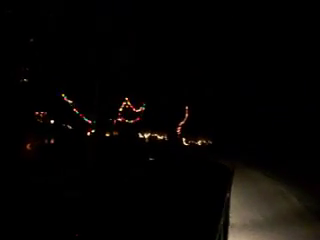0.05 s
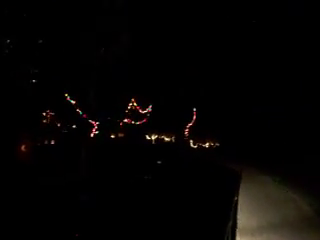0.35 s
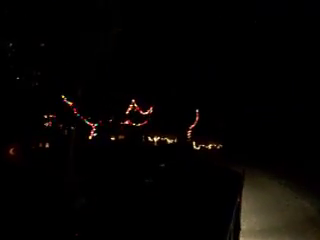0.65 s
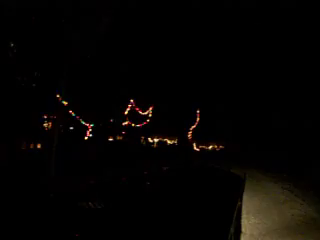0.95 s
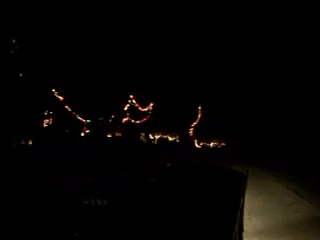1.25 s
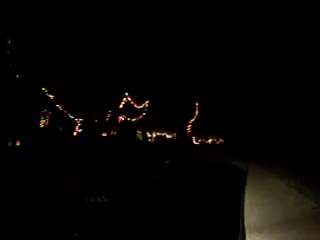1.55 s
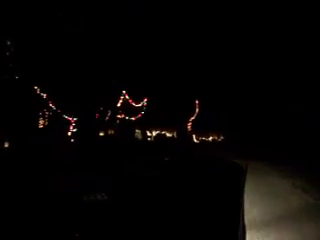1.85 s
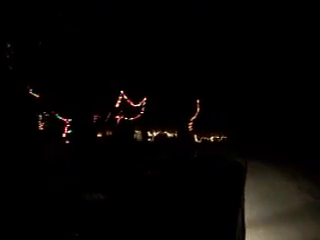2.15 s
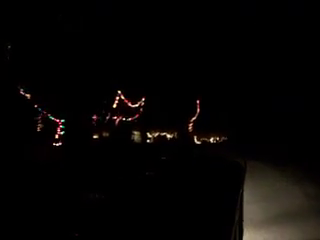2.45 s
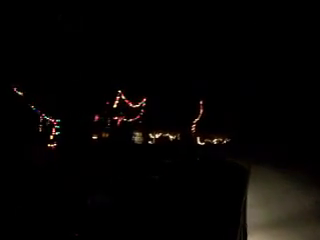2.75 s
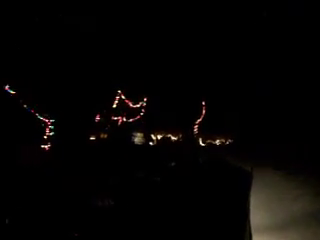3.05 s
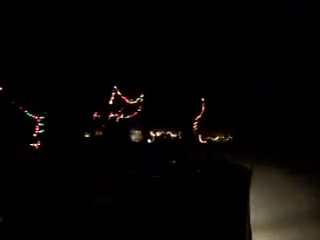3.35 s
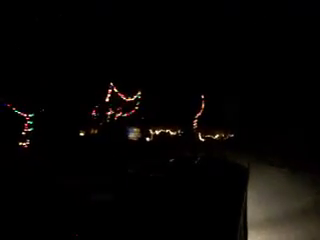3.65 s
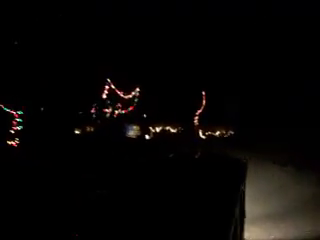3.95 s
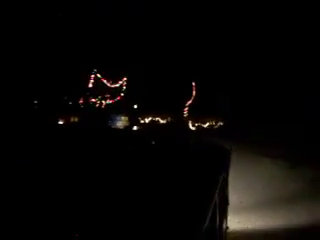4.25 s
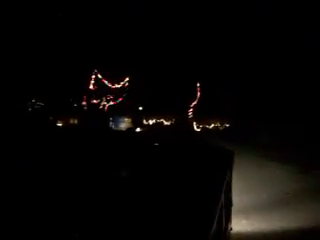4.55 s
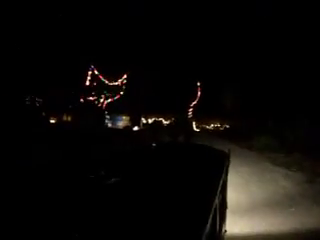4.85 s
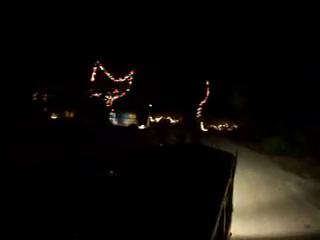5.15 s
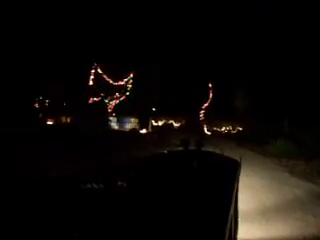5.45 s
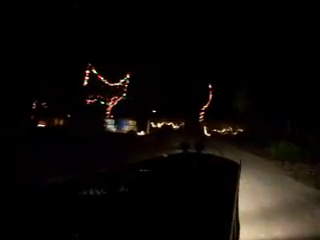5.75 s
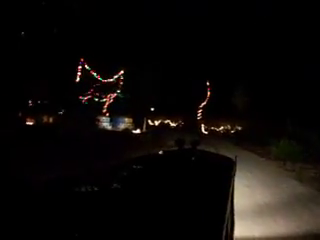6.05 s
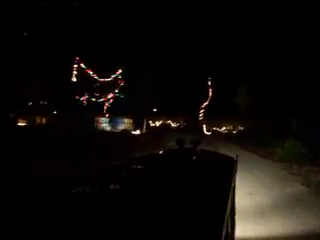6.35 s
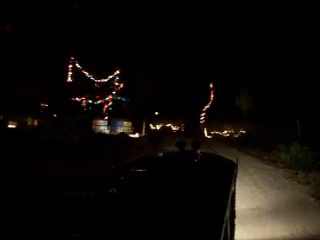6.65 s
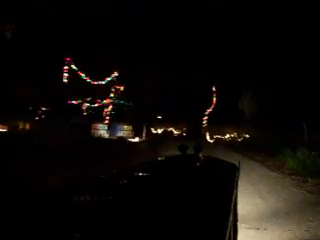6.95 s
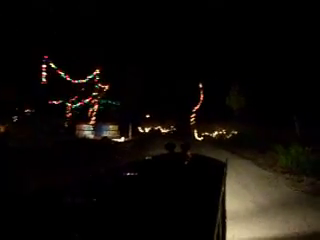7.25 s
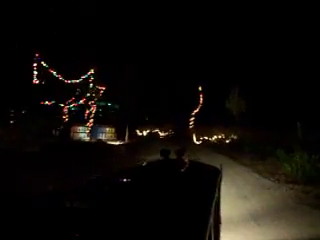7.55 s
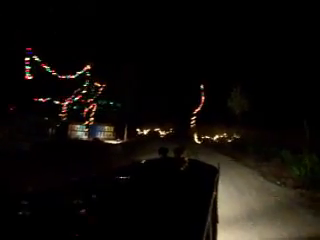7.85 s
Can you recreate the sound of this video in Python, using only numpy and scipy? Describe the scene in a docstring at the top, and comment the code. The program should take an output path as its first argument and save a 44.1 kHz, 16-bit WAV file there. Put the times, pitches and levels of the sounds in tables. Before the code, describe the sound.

Low, rapid exhaust beats drone from a miniature train rolling along its track, over wheel rumble, faint hiss and occasional knocks.

```python
"""Paired exhaust beats thump from the slow V-twin engine of a ride-on locomotive, heard from its seat.
Each cylinder's puff rings the muffler; the engine sags for about a second, then picks up again.
Firings and rough track shake the hood, valves tick, and wheels rumble and sing faintly on the rails,
under a light rattle and hiss. Bumps heave the chassis, slack parts knock now and then,
and loose metal clinks three times."""
import sys
import numpy as np
from scipy import signal
from scipy.fft import rfft, irfft, next_fast_len
from scipy.io import wavfile
from scipy.ndimage import map_coordinates

SR = 44100
rng = np.random.default_rng(int(sys.argv[2]) if len(sys.argv) > 2 else 0)


def int16_out(signal):
    """Quantize to a 16-bit WAV file."""
    q = np.round(np.clip(np.atleast_2d(signal).T, -1, 1) * 32767)
    wavfile.write(sys.argv[1], SR, q.astype(np.int16))


N = 348831
TIME = np.arange(N) / SR

# engine speed: t/s, speed/rpm
ENGINE_SPEED = [(0.0, 1433.4), (0.48, 1401.2), (1.06, 1456.0), (1.57, 1375.6), (1.93, 1203.4),
                (2.1, 1237.7), (2.6, 1214.9), (3.0, 1454.0), (3.3, 1417.7), (4.21, 1383.0), (4.4, 1403.5),
                (5.73, 1407.1), (6.33, 1356.9), (6.83, 1403.7), (7.07, 1388.7), (7.91, 1430.1)]
# how hard the locomotive pulls: t/s, level/dB
EFFORT = [(0, 2.3), (.25, -3.2), (.74, 0.1), (.9, -2.1), (1.35, 2), (1.92, -0.8), (2.12, 0.9), (2.53, 1.5),
          (2.65, -2.5), (3.02, -0.5), (4.5, .5), (4.75, -1.8), (5.8, 0.65), (6.52, 0.9), (6.82, -0.46),
          (7.58, 1), (7.73, -1), (7.91, 1.7)]
# tones the muffler rings at: f/Hz, width/Hz, level/dB
MUFFLER_TONES = [(66.7, 21, -8.5), (89.7, 26, -4.5), (99.5, 8.4, 3.5), (140, 21, -11), (192.2, 42, 0),
                 (234.4, 19.6, 0)]
# tones the hood panels ring at: f/Hz, width/Hz, level/dB
HOOD_TONES = [(349, 8, 1), (446.3, 26, 7), (482, 65, -4.5), (664, 16, -2.5), (838, 20, -2),
              (1090, 20, -8.5), (1140, 27, -10.5)]
# ticks in each engine cycle: place/cycle, f/Hz, width/Hz, level/dB
VALVE_TICKS = [(-.01, 5860, 2980, -4), (.035, 4180, 2990, -2), (.36, 5400, 3000, -4.5),
               (.53, 4800, 3040, -14), (.77, 2020, 672, 4.5), (.89, 2190, 660, 9)]
# bumps in the track: t/s, chassis heave/dB, change in rumble/dB
TRACK_BUMPS = [(.33, -42, 3), (.92, -29, 0), (1.73, -23, 1.4), (2.07, -19, 0.8), (3.17, -39, 1.8),
               (3.55, -30, 1.3), (4.16, -36, 1.3), (4.93, -24, -1.1), (6.29, -23, 2.5), (6.83, -35, 1),
               (7.17, -25.5, .2), (7.56, -27, 3.5)]
# how strong four noises are from low to high pitch: f/Hz, level/dB
SWAY_COLOUR = [(8, -10.5), (16, -2), (23, -3), (32, -6), (42, -5.5), (54, -9), (75, -27.5), (200, -120)]
RUMBLE_COLOUR = [(30, -10), (85, 2.5), (135, 1), (285, -1), (340, 1.5), (450, -2), (560, -4), (740, -9),
                 (850, -9.5), (1010, -14), (1130, -15), (1320, -27.5), (2000, -35.5), (5000, -120)]
RATTLE_COLOUR = [(500, -35.5), (1100, -12.5), (1350, 3), (1580, 1.5), (1850, 4.5), (2250, 3.5), (2800, -4),
                 (4000, -35), (9000, -70.5)]
HISS_COLOUR = [(1000, -22.5), (2500, -7), (3200, 10.5), (3700, 6), (4250, 8), (4650, 5.5), (4900, 7.5),
               (5400, 7), (5520, -2), (5700, 6.5), (6500, 1), (7450, -0.5), (8000, -45.5), (8900, -40.5)]
# slow rise and fall of the hiss and ticks: t/s, level/dB
TREBLE_DRIFT = [(0, 0.2), (1.9, -1.7), (2.7, 3), (3.05, -0.5), (4.45, 1.9), (5.55, -0.7), (7.91, 0.2)]
# wheel flanges (the guiding rims) rubbing the rail: start/s, end/s, f/Hz, width/Hz, level/dB
FLANGE_RUBS = [(0, 1.6, 4950, 300, -59), (1.95, 2.55, 7150, 450, -57), (2.1, 2.62, 1760, 60, -47),
               (2.0, 2.62, 1925, 80, -47.5), (2.44, 2.64, 3380, 120, -50), (2.9, 3.9, 4970, 220, -56),
               (4.8, 5.7, 5370, 130, -56)]
# knocks of slack parts in the running gear: t/s, relative level/dB
GEAR_KNOCKS = [(1.017, -31), (1.408, -31), (1.622, -29), (1.780, -28), (2.555, -28), (2.781, -29),
               (6.300, -27), (7.370, -22), (7.800, -29)]
# broad tones of a knock: f/Hz, width/Hz, level/dB
KNOCK_TONES = [(1100, 500, 5), (2000, 700, -1), (3300, 700, -5)]
# strikes of loose metal: t/s, peak level/dB
METAL_STRIKES = [(3.018, -34), (4.595, -20.5), (4.776, -33)]
# a strike and its bounce: delay/s, level/dB
STRIKE_AND_BOUNCE = [(0, 0), (.005, -2)]
# tones the metal rings at: f/Hz, level/dB, time to fade by 60 dB/s
METAL_TONES = [(2945, -4, .04), (3900, -7, .02), (4410, -8, .03), (5330, -4, .035), (5420, -2.5, .05),
               (6260, -5, .04), (6520, -6, .035)]

SECOND_FIRING = .371  # share of a cycle by which the second cylinder follows the first


def amp(db):
    """Turn decibels into a gain."""
    return 10 ** (np.asarray(db) / 20)


def unit(x):
    """Scale a sound to an average (rms) size of 1."""
    return x / np.sqrt(np.mean(x ** 2) + 1e-20)


def curve(points):
    """Join (time, value) points with straight lines."""
    return np.interp(TIME, *np.transpose(points))


def wobble(rate):
    """A smooth curve through `rate` random values a second."""
    return map_coordinates(rng.standard_normal(int(N * rate / SR) + 4), [TIME * rate])


def filtered(x, response):
    """Multiply each frequency in x by response(f)."""
    size = next_fast_len(N + SR // 2)
    return irfft(rfft(x, size) * response(np.fft.rfftfreq(size, 1 / SR)), size)[:N]


def coloured(x, colour):
    """Shape x with a colour table, at an average size of 1."""
    hz, db = np.transpose(colour)
    return unit(filtered(x, lambda f: amp(np.interp(np.log(f + 1), np.log(hz), db))))


def resonate(x, tones):
    """Let x ring a set of tones; narrow ones ring longer."""
    return filtered(x, lambda f: sum(amp(db) * 1j * f * width / (hz * hz - f * f + 1j * f * width)
                                     for hz, width, db in tones))


def strokes(cycle, place, scatter_db):
    """One tap of random size whenever the engine passes a place in its cycle."""
    at = np.flatnonzero(np.diff(np.floor(cycle - place)) > 0)
    taps = np.zeros(N)
    taps[at] = amp(scatter_db * rng.standard_normal(len(at)))
    return taps


def bursts(taps, fade_s):
    """Each tap becomes a burst of noise that drops 60 dB in fade_s."""
    fade = amp(-60 * TIME[:SR // 10] / fade_s)
    return signal.fftconvolve(taps, fade)[:N] * rng.standard_normal(N)


def chatter(rate, depth_db):
    """Noise from many small contacts, arriving in clumps."""
    return rng.standard_normal(N) * amp(depth_db * wobble(rate))


def puffs(cycle, place, width, scatter_db):
    """One puff of gas a cycle; its width is a share of the cycle, so it lengthens as the engine slows."""
    nearest = np.round(cycle - place).astype(int)
    sizes = amp(scatter_db * rng.standard_normal(nearest.max() + 2))
    return sizes[nearest] * np.exp(-.5 * ((cycle - place - nearest) / width) ** 2)


def exhaust(cycle, width, edge_width, edge_db, bass_cut_hz):
    """Each puff rings the muffler and has a sharper edge; the open pipe gives off little deep bass."""
    def both_cylinders(puff_width):
        first = puffs(cycle, 0, puff_width, scatter_db=0.7)
        return first + 0.86 * puffs(cycle, SECOND_FIRING, puff_width, scatter_db=-0.6)

    thump = unit(resonate(both_cylinders(width), MUFFLER_TONES))
    edge = amp(edge_db) * unit(both_cylinders(edge_width))
    return -unit(filtered(thump + edge, lambda f: f ** 2 / np.hypot(f ** 2, bass_cut_hz ** 2)))


def hood(cycle):
    """The hood's panels ring from the firings and from the rough track."""
    firings = strokes(cycle, 0, scatter_db=-0.5) + strokes(cycle, SECOND_FIRING, scatter_db=2.5)
    from_engine = unit(resonate(firings, HOOD_TONES))
    from_track = unit(resonate(chatter(rate=40, depth_db=2.5), HOOD_TONES))
    return amp(-19.5) * from_engine + amp(-6.5) * from_track


def valves(cycle):
    """Valve parts and burning fuel tick at the same places in every cycle."""
    ticks = np.zeros(N)
    for place, hz, width, db in VALVE_TICKS:
        taps = strokes(cycle, place, scatter_db=3.0)
        ticks += resonate(bursts(taps, fade_s=0.016), [(hz, width, db)])
    return unit(ticks)


def chassis_sway(heave, steady_db):
    """The chassis sways with a very deep noise that grows when a bump heaves it."""
    return np.hypot(amp(steady_db), heave) * coloured(rng.standard_normal(N), SWAY_COLOUR)


def wheel_rumble():
    """Wheels rolling on the rails make a low, slightly rough noise."""
    return coloured(chatter(rate=62, depth_db=0.65), RUMBLE_COLOUR)


def rattle():
    """Many small contacts blur into a light rattle."""
    return coloured(chatter(rate=180, depth_db=0.67), RATTLE_COLOUR)


def hiss():
    """Faster clumps of contacts make a high, grainy hiss."""
    return coloured(chatter(rate=380, depth_db=2.1), HISS_COLOUR)


def flange_song(ramp_s):
    """Each rub on the rail makes a wheel sing one unsteady, breathy note."""
    song = np.zeros(N)
    for start, end, hz, width, db in FLANGE_RUBS:
        contact = np.clip(np.minimum(TIME - start, end - TIME) / ramp_s, 0, 1)
        note = unit(resonate(chatter(rate=30, depth_db=2.5), [(hz, width, 0)]))
        song += amp(db) * contact * note
    return song


def bumps(half_width_s):
    """Each bump briefly heaves the chassis, and most swell the rumble too."""
    heave, swell_db = np.zeros(N), np.zeros(N)
    for s, heave_db, rumble_db in TRACK_BUMPS:
        hump = np.exp(-.5 * ((TIME - s) / half_width_s) ** 2)
        heave += amp(heave_db) * hump
        swell_db += rumble_db * hump
    return heave, swell_db


def gear_knocks(fade_s, treble_cut_hz):
    """Slack in the running gear closes with a short, dull knock."""
    blows = np.zeros(N)
    for s, db in GEAR_KNOCKS:
        blows[round(s * SR)] = amp(db + 4)
    knocks = resonate(bursts(blows, fade_s), KNOCK_TONES)
    return filtered(knocks, lambda f: 1 / np.hypot(1, (f / treble_cut_hz) ** 4))


def metal_clinks(crack_db, crack_fade_s, crack_hz, crack_width_hz):
    """Loose metal strikes with a crack, bounces once and rings briefly."""
    clinks, t = np.zeros(N + SR), TIME[:SR // 5]
    for s, db in METAL_STRIKES:
        for delay, bounce_db in STRIKE_AND_BOUNCE:
            ring = sum(amp(level + rng.normal(0, 1) - 60 * t / fade_s) * np.sin(2 * np.pi * hz * t)
                       for hz, level, fade_s in METAL_TONES)
            burst = amp(-60 * TIME / crack_fade_s) * rng.standard_normal(N)
            crack = resonate(burst, [(crack_hz, crack_width_hz, 0)])[:len(t)]
            hit = ring + amp(crack_db) * crack
            start = round((s + delay) * SR)
            clinks[start:start + len(t)] += amp(db + bounce_db) * hit / np.abs(hit).max()
    return clinks[:N]


def scene():
    """Add up all the sounds; the engine, hood, rumble, rattle and hiss swell with the effort."""
    effort_db = curve(EFFORT)
    heave, swell_db = bumps(half_width_s=0.058)
    fade_db = -0.25 * (TIME - TIME.mean())  # wheels and hood slowly get quieter
    rolling_db = -27.5 + effort_db + swell_db + fade_db + 0.74 * wobble(rate=7)
    rattle_db = -43 + effort_db + 0.5 * wobble(rate=7)
    treble_db = -46 + 0.93 * effort_db + curve(TREBLE_DRIFT) + 0.8 * wobble(rate=7.8)
    # engine cycles so far; a four-stroke cycle takes two turns
    cycle = .079 + np.cumsum(curve(ENGINE_SPEED)) / (2 * 60 * SR)
    beats = exhaust(cycle, width=0.016, edge_width=0.0077, edge_db=-20.0, bass_cut_hz=53.4)
    mix = amp(-16 + effort_db) * beats
    mix += amp(treble_db - 7) * valves(cycle)
    mix += amp(rolling_db) * hood(cycle)
    mix += chassis_sway(heave, steady_db=-32.5)
    mix += amp(rolling_db + 1) * wheel_rumble()
    mix += amp(rattle_db) * rattle()
    mix += amp(treble_db) * hiss()
    clinks = metal_clinks(crack_db=8, crack_fade_s=.03, crack_hz=4500, crack_width_hz=3500)
    mix += flange_song(ramp_s=0.091)
    mix += gear_knocks(fade_s=0.041, treble_cut_hz=3700)
    return (mix + clinks)[None]


def record(dry):
    """The highest treble falls away steeply, then stops altogether."""
    corner_hz, top_hz = 8200, 8850
    return filtered(dry[0], lambda f: (f < top_hz) / np.sqrt(1 + (f / corner_hz) ** 50))[None]


dry = scene()
out = record(dry)
int16_out(out)
```